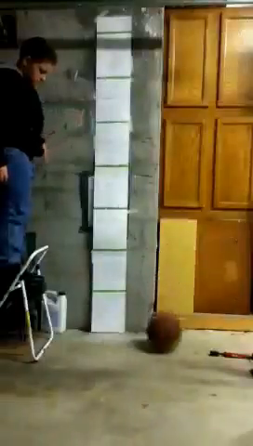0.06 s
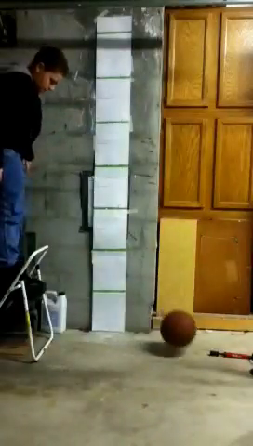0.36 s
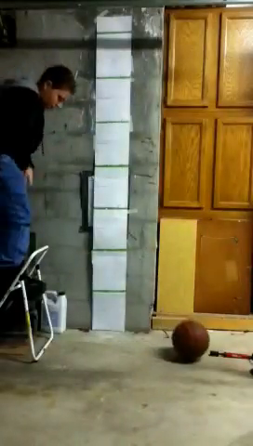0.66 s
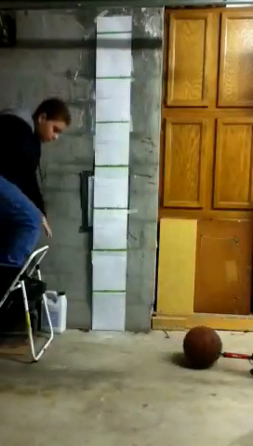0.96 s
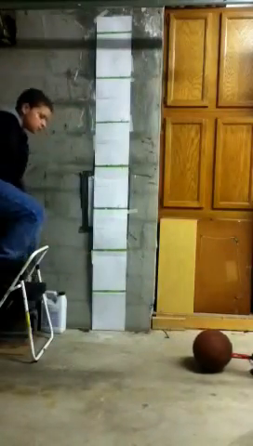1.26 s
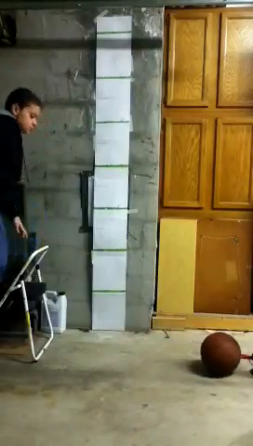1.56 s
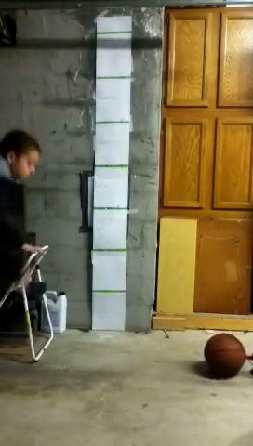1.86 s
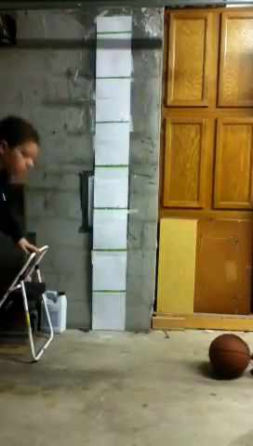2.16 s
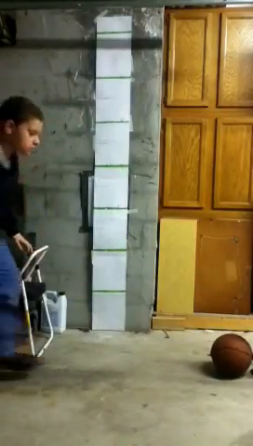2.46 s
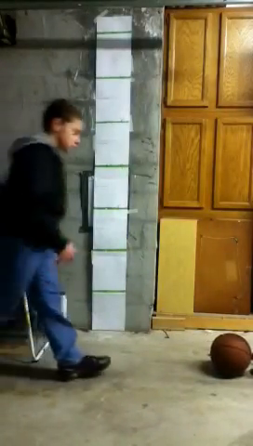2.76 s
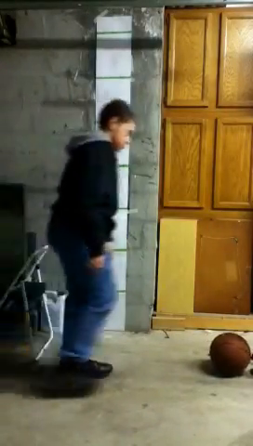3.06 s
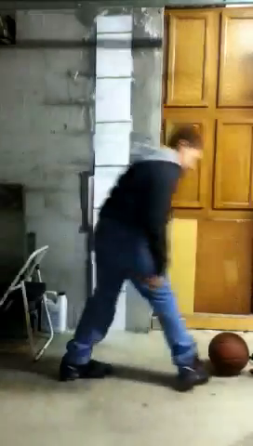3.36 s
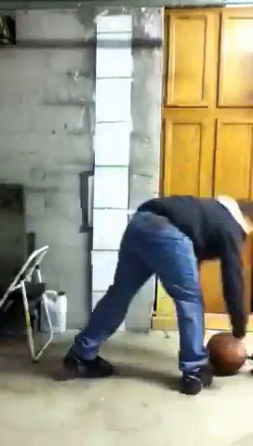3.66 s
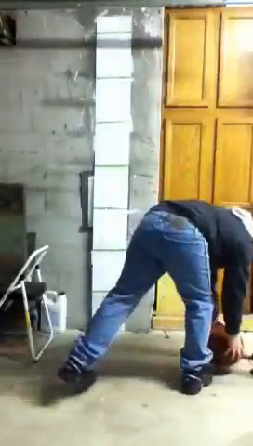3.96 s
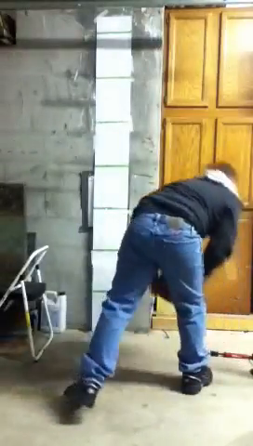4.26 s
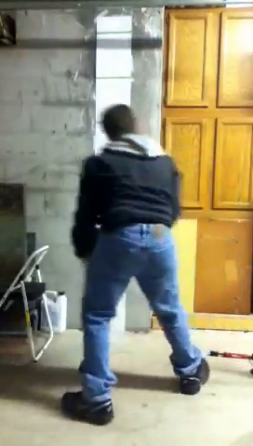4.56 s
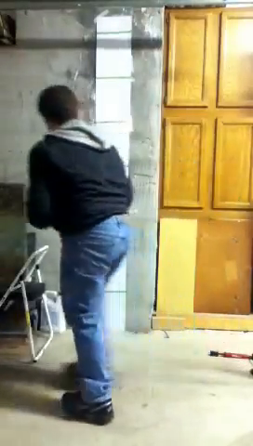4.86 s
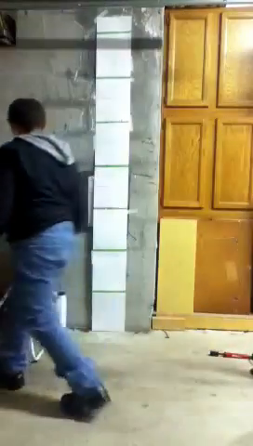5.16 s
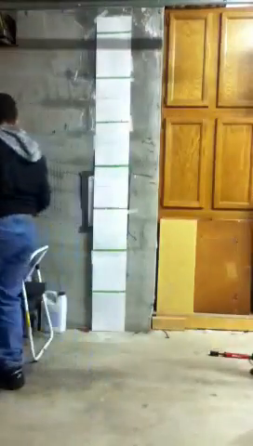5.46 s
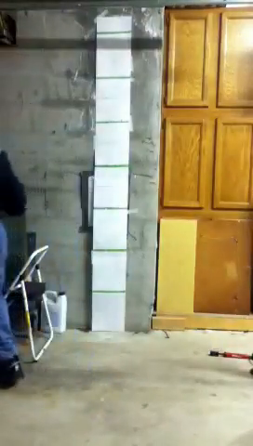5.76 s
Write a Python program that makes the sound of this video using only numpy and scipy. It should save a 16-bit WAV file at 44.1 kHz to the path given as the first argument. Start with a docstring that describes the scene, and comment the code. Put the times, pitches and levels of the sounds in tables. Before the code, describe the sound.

A soft basketball hits a concrete garage floor and dies out in four quick bounces, each quieter than the last. Someone climbs down a folding step stool with a couple of dull clunks, then walks over the gritty floor, soles scuffing and clothes faintly rustling, and shuffles back. One microphone picks up the brief ring of the walls and a faint motor hum under steady hiss.

```python
"""Dropped basketball in a garage

A soft basketball lands on concrete by the back wall and dies out in four quick bounces. Further out on
the floor, someone climbs down a folding step stool, walks over on grit, scoops the ball up and shuffles
back. One microphone hears it all, with block walls ringing briefly around each sound and a motor
humming faintly under a steady hiss."""
import sys
import numpy as np
from scipy import signal
from scipy.fft import rfft, irfft, next_fast_len
from scipy.io import wavfile
from scipy.ndimage import uniform_filter1d

SR = 44100
rng = np.random.default_rng(int(sys.argv[2]) if len(sys.argv) > 2 else 0)


def transcribe(u):
    """Save the signal u as a 16-bit wav file named by the first command-line argument.

    u: samples, shape (n,) or (channels, n), limited to [-1, 1]; the rate is SR.
    q: integer samples, one column per channel.
    """
    v = np.clip(np.atleast_2d(u).T, -1, 1)
    q = np.round(v * 32767).astype(np.int16)
    wavfile.write(sys.argv[1], SR, q)


N = 256706

# spectrum of the room's hiss and rumble: (frequency [Hz], relative level [dB])
HISS_SPECTRUM = [(20, -23), (35, -10), (60, -5), (100, -1.5), (170, -0.5), (300, -2.5), (500, -7),
                 (800, -10), (1200, -11.5), (2500, -14.5), (5000, -17.5), (9000, -19.5), (13000, -24),
                 (16000, -32)]
# the hiss dips early, then swells a little: (time [s], rms level [dB])
HISS_LEVEL = [(0, -54.5), (.17, -62.5), (.7, -55), (1.4, -55), (2.2, -53.5), (4, -52.5), (5.8, -53)]
# tones of the motor: (frequency [Hz], rms level [dB])
MOTOR_TONES = [(177.6, -63.5), (721.4, -67.5), (839.8, -68.5), (1561, -76), (2040, -74.5), (2277, -75.5)]
# thin squeaks and creaks: (peak time [s], level [dB], length [s], pitch [Hz])
SQUEAKS = [(.01, -65.5, 0.094, 7760), (1.547, -56.5, 0.049, 4230), (1.556, -58, .03, 2550),
           (4.678, -41.5, 0.036, 2980)]
# ball on concrete: (time [s], hit level [dB], relative boom level [dB], treble edge [Hz])
BOUNCES = [(.1908, 4, 1.5, 11600), (0.526, -8, -9.5, 10600), (0.7284, -12, -18.5, 3450),
           (0.8583, -23.5, -32, 1780)]
# slap of the ball's skin: (frequency [Hz], relative level [dB])
SLAP_SPECTRUM = [(60, -3.5), (200, 3.5), (450, 6.5), (800, -7.5), (1100, -2), (1500, 1.5), (1900, 0),
                 (2500, 2.5), (3600, -0.5), (5000, -4.5), (7500, -2), (11000, -7.5), (16000, -16.5)]
# air inside the ball: (frequency [Hz], relative level [dB], t60 [s])
CAVITY_MODES = [(830, -4, 0.31), (887, -2, 0.32), (1290, -14, 0.075), (1410, 10, 0.048), (1499, 5, 0.042),
                (1626, 18.5, 0.028), (2130, 12, 0.017), (2487, 13, 0.041), (2640, -21, .05),
                (2850, 11, 0.048)]
# low boom of ball and room: (frequency [Hz], relative level [dB], t60 [s])
BOOM_MODES = [(124.7, -1, 0.27), (150, 6.5, 0.057), (177.7, -3, 0.18), (193, 8, 0.064), (238, -3.5, 0.14),
              (326, -21, 0.099), (342.3, -24.5, 0.99), (407, -12, 0.135)]
# echoes off the nearest walls: (delay [s], relative level [dB])
WALL_ECHOES = [(.0069, -4.5), (.0092, -3.5)]
# the garage's diffuse tail: (frequency [Hz], t60 [s], relative level [dB])
GARAGE_TAIL = [(102, 0.38, -10), (171, 0.74, 2), (255, 0.24, 0.5), (655, 0.4, 6), (2550, 0.44, 1.5),
               (6060, 0.43, -3.5), (14000, 0.33, -5.5)]
# shoes on stool and floor: (time [s], thud level [dB], pitch [Hz], knock level [dB], heel to toe [s])
FOOTFALLS = [(.998, -14.5, 200, -17, .038), (1.831, -11, 350, -19.5, 0.0237),
             (2.088, -13.5, 201, -25.5, .018), (2.136, -18.5, 198, -40, 0.035),
             (2.367, -13, 208, -22.5, 0.04), (2.5, -18, 213, -33, 0.028), (2.783, -12, 245, -18.5, 0.023),
             (3.283, -22, 654, -6.5, .02), (3.4641, -14.5, 340, -16.5, 0.0188),
             (3.912, -23, 286, -29.5, .02), (3.957, -12.5, 168, -20.5, 0.0151),
             (4.947, -15, 470, -14.5, 0.013), (5.186, -15, 300, -23.5, 0.035)]
# the stool clunks as weight shifts on it: (time [s], level [dB])
STOOL_CLUNKS = [(1.0, -15.5), (1.833, -11.5), (1.855, -18.5)]
# the stool's frame: (frequency [Hz], relative level [dB], t60 [s])
STOOL_MODES = [(268, -8, .04), (350, 6.5, 0.047), (515, -3, 0.018), (720, 4, 0.025), (810, -1.5, 0.021),
               (1070, -13, .02)]
# clothes as the walker bends and strides: (peak time [s], level [dB], half length [s])
RUSTLES = [(1.314, -54, .025), (1.92, -58.5, 0.14), (2.098, -50, 0.028), (2.892, -49.5, .042),
           (3.507, -50.5, 0.024), (3.978, -48.5, 0.045), (5.137, -52.5, 0.019)]
# small sharp taps: grit cracking underfoot, and at 1.538 s a tick of the creaking stool: (time [s], level [dB],
# band centre [Hz])
GRIT_TICKS = [(1.538, -25, 3600), (1.8294, -16.5, 2670), (2.898, -20, 2600), (3.728, -21, 3230),
              (4.2427, -19.5, 3000), (4.3839, -17, 5000), (4.4587, -18, 6000), (4.6485, -8, 5200),
              (4.67, -7, 6300), (4.678, -15.5, 4430), (5.2486, -10, 3150), (5.2854, -16.5, 4770)]
# short skids of a sole: (peak time [s], level [dB], length [s], band centre [Hz])
SKIDS = [(2.595, -56, 0.041, 4900), (3.287, -27.5, 0.018, 6000), (3.42, -50.5, 0.03, 3860),
         (3.538, -28.5, 0.037, 4840), (3.739, -53, 0.052, 4600), (4.677, -32, .022, 5000),
         (4.954, -44, .023, 3430), (5.193, -45, 0.022, 4830), (5.45, -49, 0.015, 4070),
         (5.8, -44, 0.011, 2680)]
# a foot dragged over the floor: (peak time [s], level [dB], rise [s], fall [s], relative grinding [dB])
DRAGS = [(4.49, -39.5, .08, 0.095, -3), (5.275, -45, .024, 0.074, -1)]


def amp(db):
    """Decibels to amplitude."""
    return 10 ** (np.asarray(db) / 20)


def seconds(length):
    """A time axis of about this many seconds."""
    return np.arange(next_fast_len(int(length * SR))) / SR


def unit(x):
    """Scale to an energy of one."""
    return x / np.sqrt(np.sum(x ** 2))


def add(out, s, x):
    """Mix x in from time s."""
    i = int(round(s * SR))
    x = x[max(-i, 0):N - i]
    out[max(i, 0):max(i, 0) + len(x)] += x


def band(x, low_hz, high_hz, order=2):
    """Causal band-pass."""
    high_hz = min(high_hz, .45 * SR)
    low_hz = min(low_hz, .95 * high_hz)
    return signal.sosfilt(signal.butter(order, [low_hz, high_hz], "band", fs=SR, output="sos"), x)


def colour(x, points):
    """Minimum-phase filter through points of (frequency [Hz], gain [dB])."""
    hz, db = np.transpose(points)
    bin_hz = np.maximum(np.abs(np.fft.fftfreq(len(x), 1 / SR)), 1)
    log_gain = np.log(amp(np.interp(np.log(bin_hz), np.log(hz), db)))
    response = np.exp(np.conj(signal.hilbert(log_gain)))
    return np.fft.ifft(np.fft.fft(x) * response).real


def flatten(x, width_hz=100):
    """Level out the broad humps in a noise's spectrum, keeping its fine ripple."""
    power = uniform_filter1d(np.abs(rfft(x)) ** 2, max(int(width_hz * len(x) / SR), 3))
    hz = np.fft.rfftfreq(len(x), 1 / SR)
    gain_db = -10 * np.log10(power / power.mean() + .3)
    return colour(x, np.c_[hz, gain_db][1:])


def fade(t, t60):
    """Fall by 60 dB every t60 seconds."""
    return np.exp(-np.log(1000) * t / t60)


def ring(modes, t):
    """Struck modes dying away."""
    return unit(sum(amp(db) * np.sin(2 * np.pi * hz * t) * fade(t, t60) for hz, db, t60 in modes))


def burst(t, t60):
    """White noise dying away."""
    return unit(flatten(rng.standard_normal(len(t)) * fade(t, t60)))


def add_rub(out, s, db, rise, fall, low_hz, high_hz, grit_db, grain_s=.0005):
    """Dense slips of uneven size swell to a peak at time s and die as one surface drags over another."""
    t = seconds(3 * (rise + fall)) - 3 * rise
    pressure = np.exp(-(t / np.where(t < 0, rise, fall)) ** 2)
    slips = amp(grit_db * np.minimum(rng.exponential(size=4096), 2.8))
    slip_index = (np.arange(len(t)) / (grain_s * SR)).astype(int) % len(slips)
    grains = slips[slip_index] * rng.standard_normal(len(t))
    rub = unit(pressure * band(grains, low_hz, high_hz))
    add(out, s + t[0], amp(db) * rub * np.linalg.norm(pressure))


def room_tone(waver=0.45):
    """Hiss and rumble all round the microphone, with the wavering tones of a faint motor."""
    t = np.arange(N) / SR
    noise = colour(rng.standard_normal(next_fast_len(N)), HISS_SPECTRUM)[:N]
    hiss = unit(noise) * np.sqrt(N) * amp(np.interp(t, *np.transpose(HISS_LEVEL)))
    knots_s = np.linspace(0, t[-1], 40)
    hum = 0
    for hz, db in MOTOR_TONES:
        swell, drift = (np.interp(t, knots_s, row) for row in rng.standard_normal((2, len(knots_s))))
        tone = np.sqrt(2) * np.sin(2 * np.pi * hz * t + 2 * waver * drift)
        hum += amp(db) * (1 + waver * swell) * tone
    return hiss + hum


def squeaks(rise_share=0.12, spread=1.057):
    """Rubbing that sings in one narrow band."""
    out = np.zeros(N)
    for s, db, length, hz in SQUEAKS:
        rise, fall = rise_share * length, (1 - rise_share) * length
        add_rub(out, s, db, rise, fall, hz / spread, hz * spread, grit_db=12.5)
    return out


def ball(slap_db=0.5, cavity_db=-11, boom_db=4, return_db=-5, round_trip_s=0.001356, contact_s=0.0012):
    """The skin slaps the floor, a pulse crosses the ball and returns, its air rings and it booms."""
    out, t = np.zeros(N), seconds(.7)
    for s, db, thump_db, edge_hz in BOUNCES:
        impulse = t == 0
        crack = flatten(impulse + amp(1) * burst(t, t60=0.031), width_hz=60)
        slap = amp(slap_db) * unit(colour(crack, SLAP_SPECTRUM))
        hit = band(slap + amp(cavity_db) * ring(CAVITY_MODES, t), 40, edge_hz, order=1)
        # a soft ball takes some milliseconds to flatten, so the boom comes late
        boom = ring(BOOM_MODES, t) * (1 - np.exp(-t / contact_s))
        bounce = amp(db) * hit + amp(thump_db + boom_db) * boom
        # each bounce lands on a new spot near the back wall and has its own tail
        add(out, s, garage(bounce, walls_db=2, wet_db=3))
        # the returning pulse is distinct only on the direct path to the microphone
        add(out, s + round_trip_s, amp(db + return_db) * band(slap, 40, edge_hz, order=1))
    return out


def garage(x, walls_db, wet_db, build_s=0.0034, clutter_db=4, clutter_t60=0.058):
    """The microphone gets the direct sound, echoes off the nearest walls and a short diffuse tail."""
    t = seconds(1.0)
    hz, t60, db = np.transpose(GARAGE_TAIL)
    bin_hz = np.fft.rfftfreq(len(t), 1 / SR)
    spectrum = rfft(rng.standard_normal(len(t)))
    edges_hz = np.r_[0, 80 * 2. ** np.arange(9), SR]
    tail = 0
    for low, high in zip(edges_hz, edges_hz[1:]):
        octave = irfft(spectrum * ((bin_hz >= low) & (bin_hz < high)), len(t))
        octave_t60 = np.interp(np.log(high / np.sqrt(2)), np.log(hz), t60)
        tail += octave * fade(t, octave_t60)
    # things standing close by scatter a dense, quickly dying first wave
    swell = (1 - np.exp(-t / build_s)) * (1 + amp(clutter_db) * fade(t, clutter_t60))
    tail = unit(flatten(tail * swell))
    walls = np.zeros(len(t))
    for delay, echo_db in WALL_ECHOES:
        walls[int(delay * SR)] += amp(echo_db + walls_db)
    # door panels mirror only the shorter waves
    response = amp(wet_db) * colour(tail, np.c_[hz, db]) + band(walls, 240, 8400, order=1)
    return x + signal.fftconvolve(x, response)[:len(x)]


def thud(t, hz, onset_s, t60=0.042, spread=1.24, shudder_db=2):
    """Weight pressing on the floor: a low push and a shudder around the same pitch."""
    press = 1 - np.exp(-t / onset_s)
    push = unit(press * np.sin(2 * np.pi * hz * t) * fade(t, t60))
    shudder = unit(band(burst(t, t60), hz / spread, hz * spread))
    return unit(push + amp(shudder_db) * shudder)


def footfalls(soft_step_hz=200, soft_onset_s=0.0047, tap_db=-6, toe_db=-6):
    """The heel lands with a thud, a knock and a light tap, then the foot rolls softly onto the toe."""
    out, t = np.zeros(N), seconds(.2)
    for s, db, hz, knock_db, roll_s in FOOTFALLS:
        # a harder landing is higher in pitch, sets in faster and knocks more brightly
        onset_s = soft_onset_s * (soft_step_hz / hz) ** 1.6
        press = 1 - np.exp(-t / onset_s)
        knock = unit(band(press * burst(t, t60=0.017), 1.13 * hz, 4.15 * hz))
        tap = amp(tap_db) * unit(band(press * burst(t, t60=0.034), 1000, 2900))
        add(out, s, amp(db) * thud(t, hz, onset_s) + amp(knock_db) * (knock + tap))
        add(out, s + roll_s, amp(db + toe_db) * thud(t, hz=215, onset_s=0.0037))
    return out


def stool():
    """The loaded frame rings very briefly at each clunk."""
    out = np.zeros(N)
    for s, db in STOOL_CLUNKS:
        add(out, s, amp(db) * ring(STOOL_MODES, seconds(.1)))
    return out


def rustles():
    """Cloth sliding over cloth swells and fades evenly."""
    out = np.zeros(N)
    for s, db, half in RUSTLES:
        add_rub(out, s, db, half, half, low_hz=1480, high_hz=9400, grit_db=5.5)
    return out


def grit_ticks(t60=0.0034, spread=1.88):
    """Grit gives way under a sole, or the stool ticks as it creaks, in single sharp cracks."""
    out, t = np.zeros(N), seconds(.05)
    for s, db, hz in GRIT_TICKS:
        add(out, s, amp(db) * unit(band(burst(t, t60), hz / spread, hz * spread)))
    return out


def skids(rise_share=0.29, spread=2.11, grit_db=6.5, scrape_db=-15):
    """The sole bites quickly and slides to a stop, a bright rasp over a duller scrape."""
    out = np.zeros(N)
    for s, db, length, hz in SKIDS:
        rise, fall = rise_share * length, (1 - rise_share) * length
        add_rub(out, s, db, rise, fall, hz / spread, hz * spread, grit_db)
        add_rub(out, s, db + scrape_db, rise, fall, 700, 2600, grit_db)
    return out


def drags(weight_lag_s=.022, crackle_db=-6):
    """Grit hisses and crackles under a sliding foot; a lower grinding joins as weight comes onto it."""
    out = np.zeros(N)
    for s, db, rise, fall, grind_db in DRAGS:
        add_rub(out, s, db, rise, fall, low_hz=2870, high_hz=11000, grit_db=5)
        add_rub(out, s, db + crackle_db, rise, fall, 3000, 13900, grit_db=26, grain_s=0.00098)
        add_rub(out, s + weight_lag_s, db + grind_db, .7 * rise, fall, 860, 5000, grit_db=8.5)
    return out


def scene():
    """In mono: the ball close to the back wall, the walker further out, where wall echoes are weaker."""
    steps = garage(footfalls() + stool(), walls_db=-10, wet_db=1.5)
    rubbing = garage(squeaks() + rustles() + skids() + drags(), walls_db=-21, wet_db=-0.5)
    grit = garage(grit_ticks(), walls_db=-10, wet_db=0)
    # things this small radiate little deep bass, and rubber dulls the very top
    action = band(ball() + steps + rubbing + grit, 56, 13200)
    return (action + room_tone())[None]


def record(dry, top_hz=16200):
    """The recorder behind the microphone cuts the top treble steeply."""
    return signal.sosfilt(signal.ellip(8, .2, 70, top_hz, fs=SR, output="sos"), dry)


dry = scene()
out = record(dry)
transcribe(out)
```